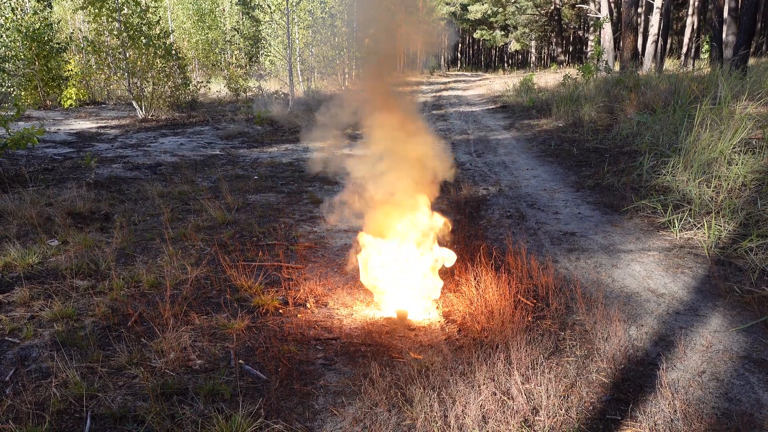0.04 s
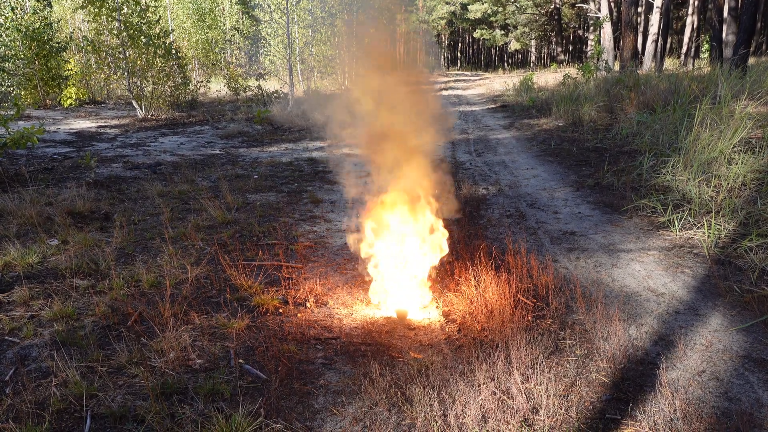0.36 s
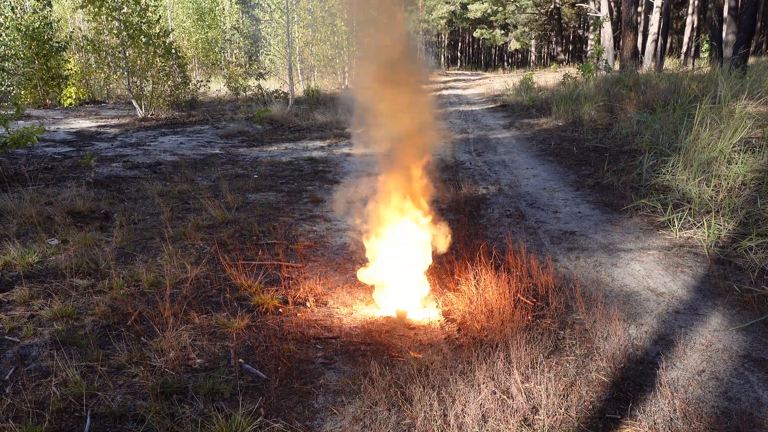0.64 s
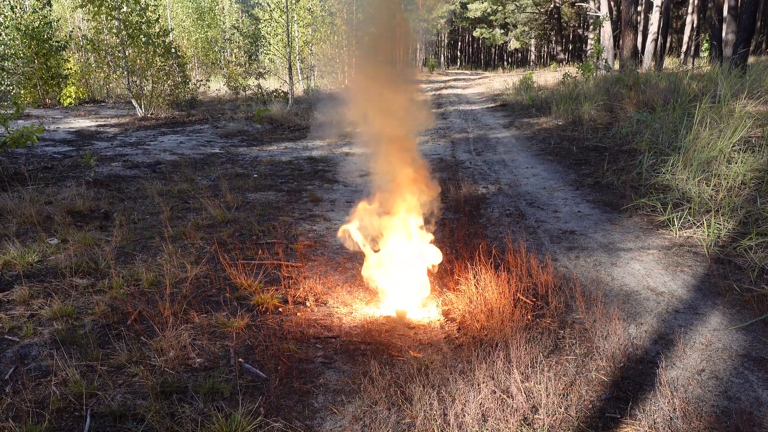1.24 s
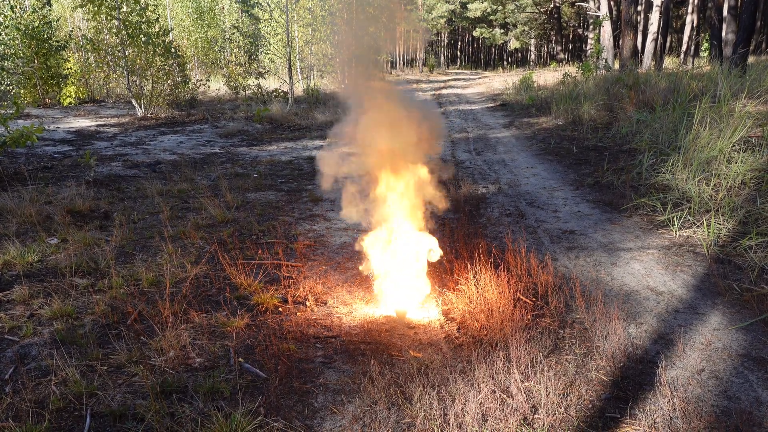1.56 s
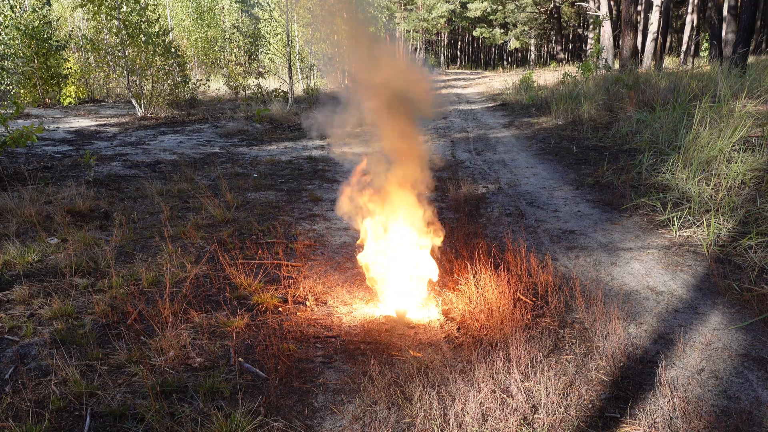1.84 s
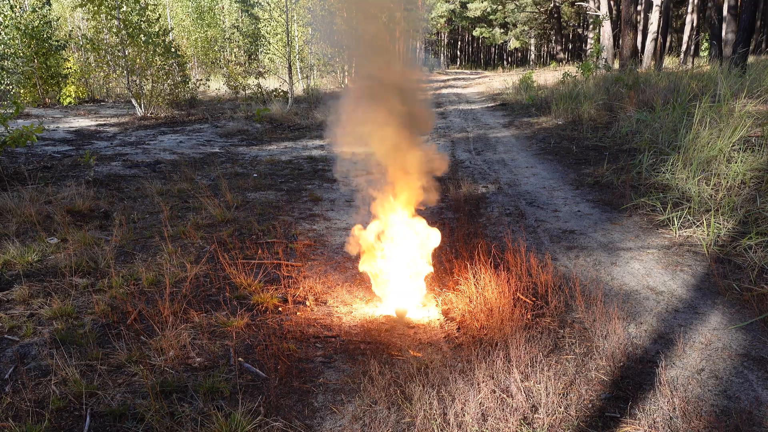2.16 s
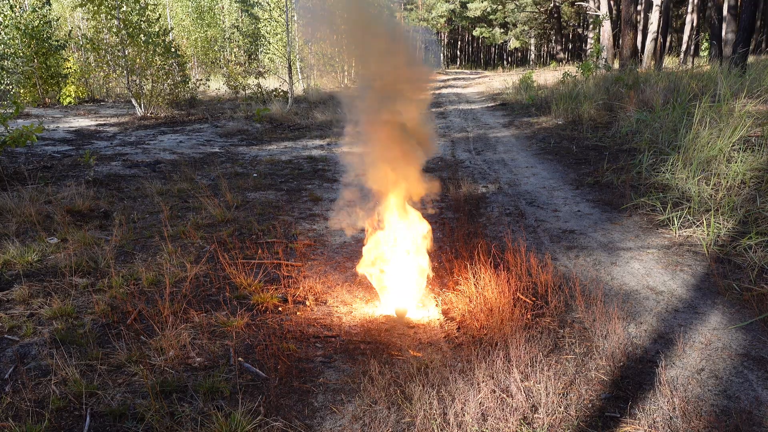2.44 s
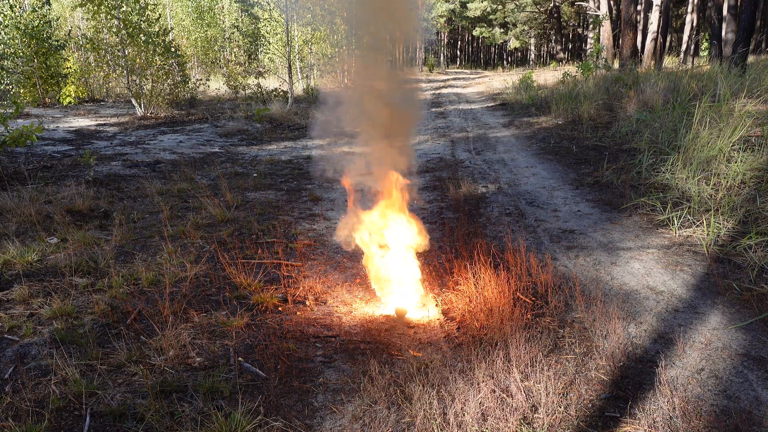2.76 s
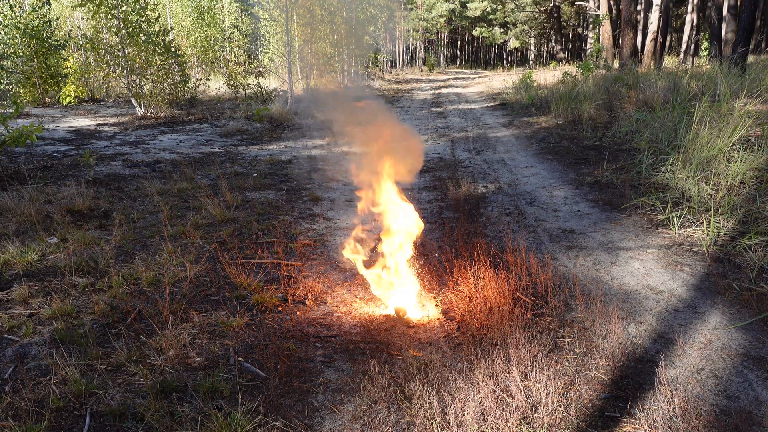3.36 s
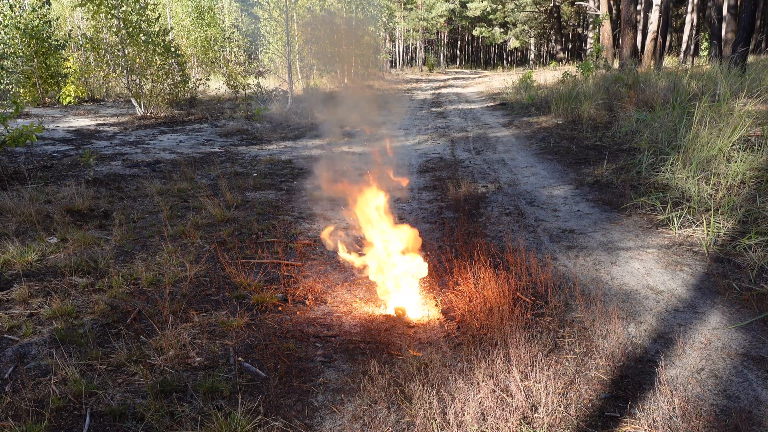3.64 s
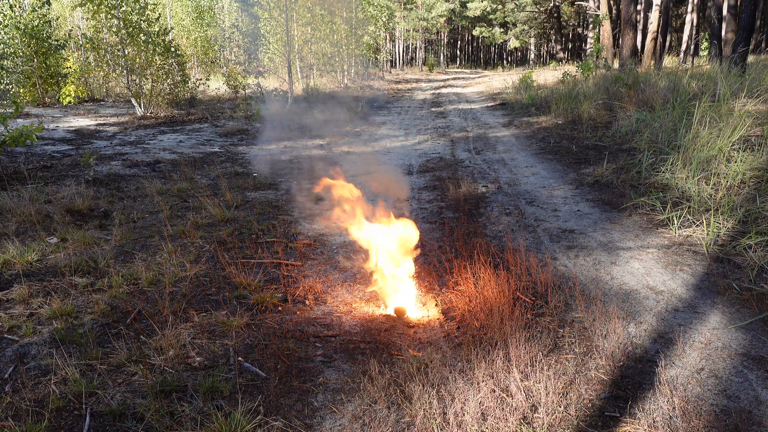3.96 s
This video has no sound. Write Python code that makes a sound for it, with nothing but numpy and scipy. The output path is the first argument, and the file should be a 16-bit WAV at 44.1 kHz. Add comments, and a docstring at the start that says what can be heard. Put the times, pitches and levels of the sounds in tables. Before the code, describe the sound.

A fire burns on dry ground with a loud, continuous hiss over a faint low roar. Tiny sparks crackle and a few sharp pops stand out as the hiss weakens slightly and sputters, a few metres away outdoors.

```python
"""A gas jet hisses over a low roar: an incendiary charge is burning on dry ground in the open,
a few metres in front of a stereo microphone. Tiny sparks crackle in the hiss, and rising billows
add falling swishes. As the flame shrinks the hiss weakens and sputters, and a few sharp pops stand out."""
import sys
import numpy as np
from scipy import signal
from scipy.fft import rfft, irfft
from scipy.io import wavfile

SR = 44100
rng = np.random.default_rng(int(sys.argv[2]) if len(sys.argv) > 2 else 0)


def persist_wave(psi):
    """Save psi, clipped to +-1, as 16-bit WAV."""
    counts = np.round(np.clip(psi, -1, 1) * 32767).astype(np.int16)
    wavfile.write(sys.argv[1], SR, np.atleast_2d(counts).T)


N = 176400
TIME, FREQS = np.arange(N) / SR, np.fft.rfftfreq(N, 1 / SR)
TOP_HZ = 15750  # the recorder's upper limit


def undb(db):
    """Decibels to gain."""
    return 10 ** (np.asarray(db) / 20)


def unit(x):
    """Scale to an rms of 1."""
    return x / np.sqrt(np.mean(x ** 2))


def colour(points):
    """Gain for each frequency bin from (Hz, dB) points."""
    hz, db = np.array(points).T
    return undb(np.interp(np.log(FREQS + 1), np.log(hz), db))


def noise(gain):
    """Noise of rms 1 with the given gain for each frequency bin."""
    return unit(irfft(rfft(rng.standard_normal(N)) * gain, N))


def wander(rate_hz):
    """A smooth random drift of rms 1, mostly slower than rate_hz."""
    return noise(np.exp(-np.minimum((FREQS / rate_hz) ** 2, 20)) - np.exp(-20))


def add(out, start_s, sound):
    """Mix a short sound in at a given time."""
    i = int(np.clip(start_s * SR, 0, N - 1))
    out[i:i + len(sound)] += sound[:N - i]


REGISTER_HZ = {"body": 1100, "burn": 3830, "sizzle": 5700, "air": 12000}
# The shrinking flame. Each row: time in seconds, then body, burn, sizzle and air levels in dB.
FLAME_LEVELS = [(0, -2.5, 0.9, 0.6, 4.3), (1.0, -1.5, 0.5, 3, 2.5), (1.9, -1.6, 0.6, 3.2, 2.5),
                (2.17, -1.8, 0.55, 1.1, 1), (2.88, -1, 0, -0.5, 0.5), (2.96, -5, -0.2, -1, 2),
                (3.22, -3.5, -1, -2, 1.2), (3.38, -6, -1, -3.5, -3), (3.62, -5, -2, -3, -2),
                (4.0, -6.5, -2.5, -2.5, -1.5)]


def flame_db(register):
    """One register of the hiss weakens as the flame shrinks, in dB about its mean."""
    times, *levels = np.array(FLAME_LEVELS).T
    db = np.interp(TIME, times, levels[list(REGISTER_HZ).index(register)])
    return db - db.mean()


# The hiss from a few metres away. Each row: frequency in Hz, relative level in dB.
JET_SPECTRUM = [(240, -38), (400, -16), (490, -10), (680, -9.5), (1000, -6), (1350, -3), (1600, -3),
                (1820, -0.35), (2200, -2), (2800, -2), (3350, -1), (3650, .5), (4080, -1.1), (4480, -7),
                (5200, -8.5), (6100, -8), (6900, -4), (7500, -2.5), (8500, -6), (10000, -9.3),
                (11500, -11.5), (12700, -13.5), (13700, -9), (15500, -11)]
# Faint stereo difference in the low end and near 4.4 kHz; otherwise the hiss is mono.
# Each row: frequency in Hz, side minus mid level in dB.
HISS_SIDE = [(400, -22), (750, -19), (1000, -37), (1300, -64), (2400, -82), (3500, -54), (4400, -15.5),
             (5000, -25), (5600, -70), (15000, -73)]
# The treble flares or dips. Each row: centre in seconds, half length in seconds, change in dB.
JET_SPUTTERS = [(0.073, 0.051, 0.5), (0.206, 0.012, 0.5), (.31, .02, -1), (0.443, 0.018, 0.5),
                (0.684, 0.016, 3), (1.43, .025, 1.5), (3.194, 0.022, 3.5), (3.462, 0.016, -4),
                (3.555, .022, 4)]


def gas_jet(level_db=-23.5, bands=26, low_hz=350, sputter_above_hz=6000):
    """Turbulent gas hisses in bands that follow the flame, sputter and flutter together, flicker alone."""
    shape = colour(JET_SPECTRUM) * FREQS ** 4 / (FREQS ** 4 + low_hz ** 4)
    gas_spectrum = rfft(noise(shape))
    levels = np.array([flame_db(register) for register in REGISTER_HZ])
    anchors = np.log(list(REGISTER_HZ.values()))
    centres = np.linspace(20, np.sqrt(TOP_HZ), bands) ** 2
    sputter = sum(db * np.exp(-((TIME - at) / half_s) ** 2 / 2) for at, half_s, db in JET_SPUTTERS)
    flutter = 0.33 * wander(rate_hz=69)
    mid = np.zeros(N)
    for hz, this_band in zip(centres, np.eye(bands)):
        shares = np.array([np.interp(np.log(hz), anchors, row) for row in np.eye(len(anchors))])
        db = shares @ levels  # a blend of the nearest registers
        db += sputter / (1 + (sputter_above_hz / hz) ** 4)
        db += flutter * np.sqrt(hz / REGISTER_HZ["burn"])
        db += 1.16 * wander(rate_hz=23)  # this band's own flicker
        mid += undb(db) * irfft(gas_spectrum * np.interp(FREQS, centres, this_band), N)
    side_shape = shape * colour(HISS_SIDE)
    side_gain = np.linalg.norm(side_shape) / np.linalg.norm(shape)
    side = noise(side_shape) * side_gain * undb(flame_db("burn"))
    return undb(level_db) * (unit(mid) + np.array([side, -side]))


# The rumble under the hiss. Each row: frequency in Hz, relative level in dB.
ROAR_SPECTRUM = [(25, -46), (36, -29), (50, -14), (62, -9), (85, -5), (128, 0.5), (160, -0.5), (210, -2),
                 (310, 2.5), (450, -3), (700, -6), (1500, -44)]


def flame_roar(level_db=-47, side_db=-16.5, left_lead_db=0.9, throb_db=1.06):
    """The flame column rumbles and throbs; it fades faster than the burn register of the hiss."""
    mid = noise(colour(ROAR_SPECTRUM))
    side = undb(side_db) * noise(colour(ROAR_SPECTRUM))
    gain = undb(level_db + 1.36 * flame_db("burn") + throb_db * wander(rate_hz=8))
    pan = undb(left_lead_db / 2)
    return gain * np.array([(mid + side) * pan, (mid - side) / pan])


def grain_burst(hz, decay_cycles=1.6, snap=0.39):
    """A grain bursts: a one-sided snap and a ring of very few cycles."""
    cycles = np.arange(128) / SR * hz
    ring = np.exp(-cycles / decay_cycles) * np.cos(2 * np.pi * cycles)
    return ring + snap * np.exp(-cycles)


# Sharp pops, straight ahead. Each row: start in seconds, ring pitch in Hz, strength in dB.
GRAIN_POPS = [(0.777, 6800, -8), (1.4254, 7500, -12), (2.1795, 14500, 2.5), (2.5958, 11000, -12),
              (2.8114, 11500, -8), (2.9508, 11000, -17), (3.297, 10900, -8.5), (3.4323, 10000, -16)]


def crackle(sparks_per_s=210, spark_db=-37.5, spread_db=2.5, low_hz=3000, high_hz=14600):
    """Grains burst as many faint sparks at random and as a few loud pops."""
    out, burn_db = np.zeros(N), flame_db("burn")
    for when, pitch, strength in rng.random((int(sparks_per_s * N / SR), 3)):
        db = spark_db + burn_db[int(when * N)] - spread_db * np.log(1 - strength)
        hz = low_hz * (high_hz / low_hz) ** pitch
        add(out, when * N / SR, undb(db) * grain_burst(hz))
    for start_s, hz, db in GRAIN_POPS:
        add(out, start_s, undb(db) * grain_burst(hz))
    return signal.sosfilt(signal.butter(2, 1500, "high", fs=SR, output="sos"), out)


# Billows rising from the charge. Each row: peak in seconds, centre pitch there in Hz, peak level in dB.
RISING_BILLOWS = [(.07, 5900, -33), (0.201, 4170, -28), (.365, 5790, -31), (.45, 4100, -30.5),
                  (.53, 5400, -29.5), (.58, 3460, -31), (.67, 3600, -33), (.74, 2190, -30.5),
                  (.775, 5440, -32), (.81, 3900, -30.5), (.89, 4200, -30.5), (.98, 4880, -32),
                  (1.03, 3830, -28.5), (1.085, 5370, -32), (1.26, 3730, -31), (1.42, 5200, -37.5),
                  (1.66, 5250, -32), (2.87, 4300, -37), (2.97, 4110, -33), (3.215, 4080, -31.5),
                  (3.35, 3900, -37), (3.45, 4300, -36)]


def billows(rise_s=0.022, fall_s=0.025, octaves_per_s=3.8, half_width_hz=540):
    """Each billow swells and fades as a narrow band of hiss that slides down in pitch."""
    out = np.zeros(N)
    band = 1 / (1 + (FREQS / half_width_hz) ** 4)
    for peak_s, hz, db in RISING_BILLOWS:
        near = np.abs(TIME - peak_s) < 0.5
        age = TIME[near] - peak_s
        swell = np.exp(-(age / np.where(age < 0, rise_s, fall_s)) ** 2 / 2)
        phase = 2 * np.pi * np.cumsum(hz * 2 ** (-octaves_per_s * age)) / SR
        swish = noise(band)[near] * np.cos(phase) + noise(band)[near] * np.sin(phase)
        out[near] += undb(db) * swell * swish
    return out


def scene():
    """The fire stands a few metres ahead of the microphone, with no walls to echo it."""
    return gas_jet() + flame_roar() + billows() + crackle()


def record(dry):
    """The recorder cuts the highest treble steeply."""
    return signal.sosfilt(signal.ellip(10, .1, 80, TOP_HZ, fs=SR, output="sos"), dry)


dry = scene()
out = record(dry)
persist_wave(out)
```